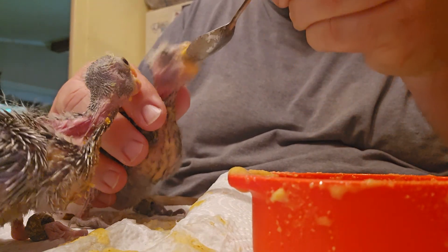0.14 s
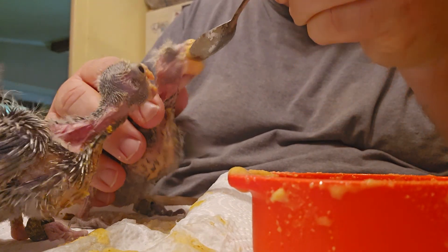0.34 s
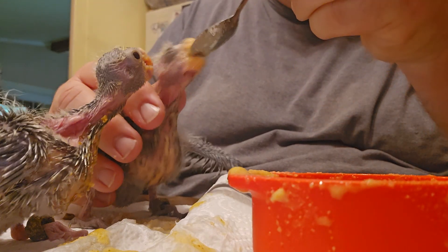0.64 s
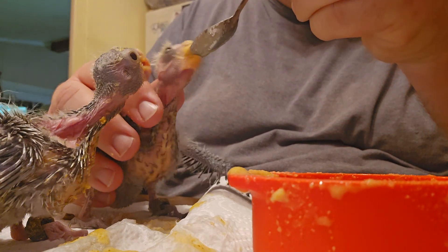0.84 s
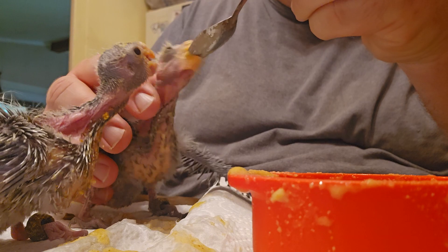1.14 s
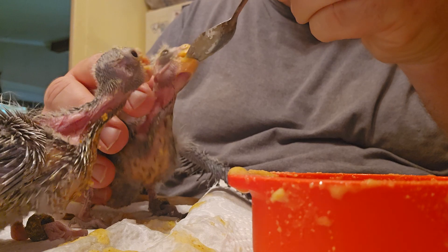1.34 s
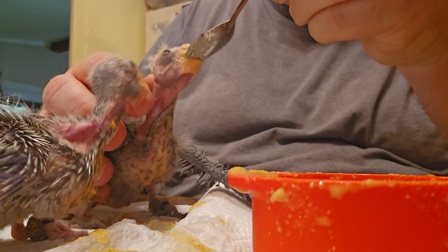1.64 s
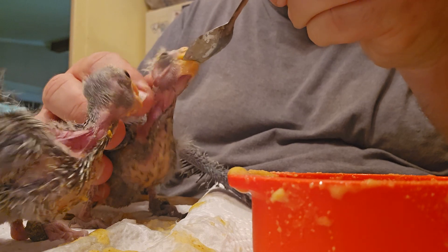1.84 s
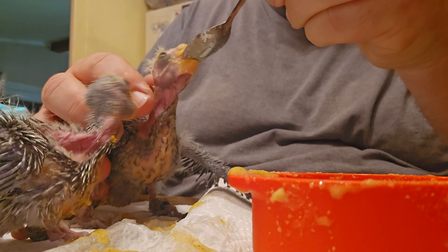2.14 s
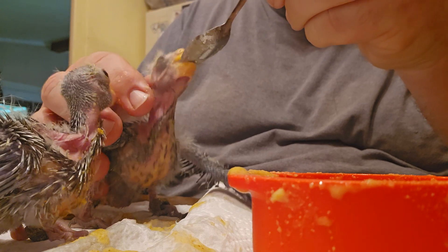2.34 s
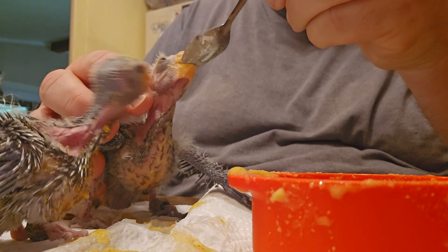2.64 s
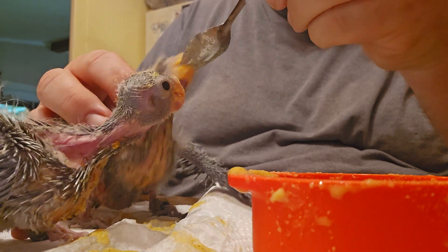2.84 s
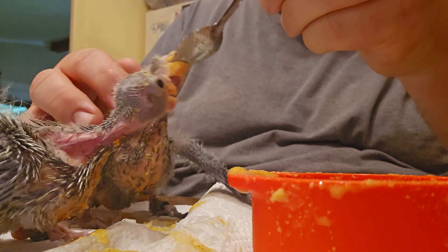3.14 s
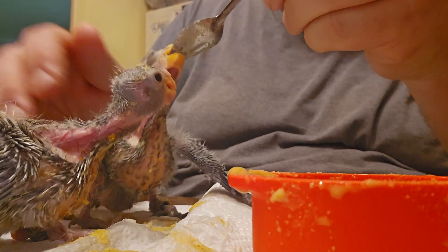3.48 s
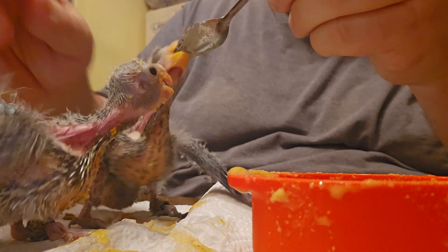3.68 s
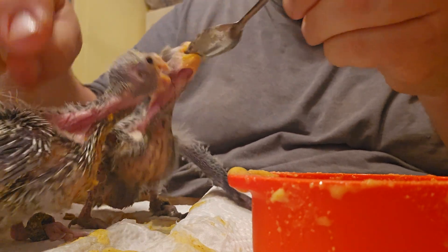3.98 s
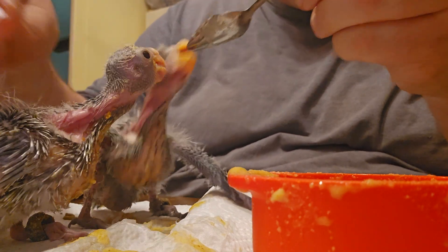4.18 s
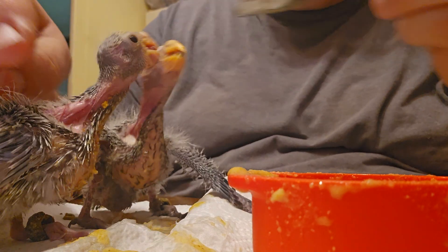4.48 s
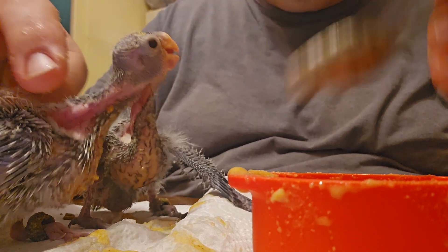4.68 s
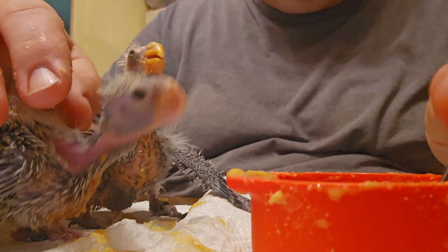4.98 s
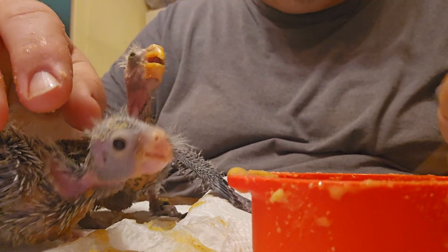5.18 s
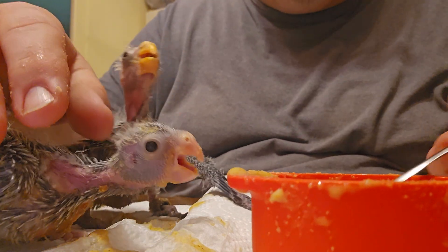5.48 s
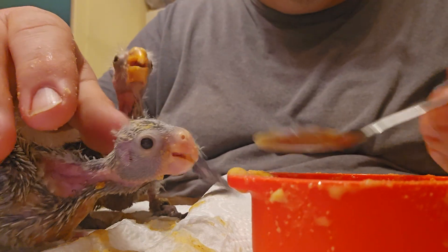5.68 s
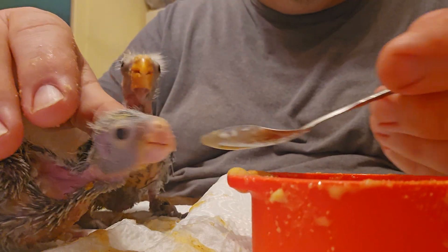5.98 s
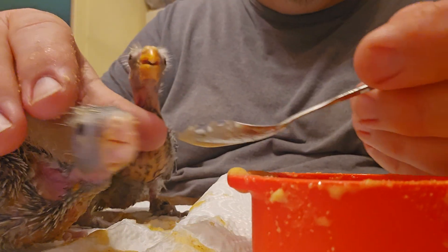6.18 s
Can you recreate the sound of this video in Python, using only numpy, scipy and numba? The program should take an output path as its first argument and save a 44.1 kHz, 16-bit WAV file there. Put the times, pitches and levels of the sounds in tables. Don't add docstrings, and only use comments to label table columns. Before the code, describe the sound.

A parrot chick gives four brief, hoarse two-part begging squeaks close up in a small room, over faint appliance hum and distant chirps.

```python
import sys
import numpy as np
from scipy import signal
from scipy.fft import rfft, irfft
from scipy.io import wavfile
from scipy.ndimage import uniform_filter1d
from numba import njit

SR = 44100
rng = np.random.default_rng(int(sys.argv[2]) if len(sys.argv) > 2 else 0)


def master_out(mix):
    frames = np.transpose(np.atleast_2d(mix))
    ceiling = np.clip(frames, -1, 1)
    pcm = np.round(ceiling * 32767).astype(np.int16)
    wavfile.write(sys.argv[1], SR, pcm)


def makeup_ratio(level_db):
    decades = np.asarray(level_db, float) / 20
    return 10 ** decades


N = 278712
TIME = np.arange(N) / SR

# [pitch_hz, level_db]
HUM_LINES = [(59.2, -66), (91.5, -57), (199.2, -49)]
# [centre_hz, width_hz, level_db]
HOUSING = [(262, 40, -67.5), (397, 30, -69.5), (486, 39, -70.5), (2250, 180, -73.5), (4770, 220, -75.5),
           (5700, 470, -78)]
# [frequency_hz, density_db]
AIR_SPECTRUM = [(20, -30), (40, -29), (70, -23), (130, -18), (220, -12), (320, -21), (500, -19),
                (900, -25.5), (1300, -30.5), (3250, -35.5), (7900, -39), (8900, -42.5), (10200, -57.5),
                (16000, -63.5)]
AIR_DB = -53.5
# [start_s, length_s, start_hz, end_hz, level_db]
FAR_CHIRPS = [(0.617, 0.037, 2200, 1920, -61), (1.083, 0.093, 3990, 4024, -65),
              (1.099, 0.074, 5000, 5100, -68), (1.512, 0.11, 4470, 4405, -64.5),
              (2.473, 0.017, 2400, 2450, -49), (2.495, 0.12, 2964, 3120, -47),
              (2.485, 0.061, 3850, 3900, -59), (2.517, 0.024, 5960, 6000, -56.5),
              (2.728, 0.047, 3760, 3720, -62.5), (2.754, 0.15, 3010, 3030, -58.5),
              (2.829, 0.032, 1930, 2200, -53), (2.877, 0.036, 2170, 2060, -51),
              (2.93, .03, 2140, 2170, -60), (3.0, 0.041, 3310, 3280, -58.5),
              (3.295, .08, 3600, 3720, -64.5), (4.067, 0.069, 4490, 4620, -54.5),
              (4.06, 0.053, 2250, 2313, -54), (4.326, 0.086, 3900, 3590, -66.5),
              (6.096, 0.041, 3500, 3050, -60.5), (6.156, 0.015, 3870, 3780, -54),
              (6.168, 0.028, 2940, 2850, -63), (6.223, 0.055, 2040, 1960, -61)]
# [length_s, start_hz, end_hz, level_db]
TRILL_NOTE = (.035, 4300, 4450, -61)
TRILL_START_S, TRILL_GAP_S, TRILL_NOTES = 0.428, 0.053, 6
# [start_s, length_s, centre_hz, width_hz, level_db]
TICKS = [(.0, 0.091, 4000, 6000, -55), (0.523, 0.026, 85, 60, -43), (1.051, 0.09, 4200, 2500, -58.5),
         (1.35, 0.01, 4500, 1800, -47), (1.352, 0.0068, 7300, 2500, -50.5), (2.481, 0.096, 3400, 1500, -47),
         (2.51, 0.047, 9000, 9000, -62.5), (4.065, 0.071, 4500, 2500, -58),
         (4.947, 0.0031, 2000, 1400, -46.5), (4.948, 0.0043, 9000, 8000, -53),
         (5.011, 0.075, 3500, 4000, -52), (5.01, 0.054, 12000, 6000, -64.5),
         (5.262, 0.0054, 7000, 8000, -39.5), (5.884, 0.0065, 3500, 3000, -62)]
ROOM_T60_S, ROOM_DAMP, ROOM_DB = 0.2, 0.03, -21
# [frequency_hz, left_minus_right_db]
PORT_COLOUR = [(60, -5.5), (110, -5.5), (200, 1.5), (380, 4), (700, -1), (1300, 0.5), (2400, 1), (4400, 3),
               (8100, 5.5), (14000, -7.5)]
# [left_ms, right_ms]
ECHO_MS = (0.3615, 0.4795)
# [start_s, left_lag_ms, left_minus_right_db, table_echo_db]
HEAD = [
    (0, 0.089, 2, -7.5),
    (1.5, 0.1, 1, -7),
    (3.5, .12, 0, -4.5),
    (5.1, 0.16, 0, -12.5),
]

# [frequency_hz, gain_db]
THROAT = [(600, -22.5), (1200, -11), (2000, -11.5), (2700, -12.5), (3300, 1), (4200, 3), (5300, -7),
          (6500, -15.5), (8500, -23), (11000, -21), (15500, -24.5)]
THROAT_SHARE, SLACK_POWER = 0.59, 0.64
# [time_s, pitch_hz, level_db, slack_db]; slack is how far overtones fall
OPENING = [
    [(.086, 1658, -32.5, -16.5), (.093, 1797, -29, -5), (.106, 1826, -22, -3), (.118, 1554, -23.5, -4),
     (.125, 1503, -19, -2), (.128, 2144, -26, -16), (.156, 1914, -20, -15.5)],
    [(1.655, 1812, -30, -8.5), (1.667, 1986, -21.5, -6), (1.684, 2024, -14, -10.5), (1.692, 2006, -22, -7),
     (1.71, 2030, -16.5, -12), (1.728, 2092, -22.5, -20)],
    [(3.634, 1553, -33.5, -21.5), (3.644, 1832, -23.5, -11), (3.653, 2008, -20, -11.5),
     (3.69, 1982, -13, -18), (3.705, 1919, -16, -13), (3.722, 1923, -19, -20)],
    [(5.258, 1604, -32.5, -23), (5.268, 1778, -24, -17), (5.282, 1818, -16, -19),
     (5.295, 1675, -12.5, -11.5), (5.307, 1453, -13.5, -11), (5.32, 1379, -16.5, -7.5),
     (5.331, 1285, -21.5, -1.5)],
]
# [start_s, length_s, entry_hz, lowest_hz, level_db]
BREAKS = [
    (0.158, 0.032, 1090, 844.2, -19),
    (1.732, .03, 1096, 913.2, -17.5),
    (3.726, .021, 956.6, 956.4, -21.5),
    (5.339, 0.034, 1076, 848.6, -14),
]
# [time_s, pitch_hz, level_db, slack_db]
HELD = [
    [(.2, 1991, -22.5, -3.5), (.21, 2123, -13.5, -9), (.222, 2050, -17.5, -3), (.235, 2052, -16.5, -10.5),
     (.26, 2032, -22, -17.5), (.33, 2030, -18, -27), (.355, 2036, -27, -30)],
    [(1.769, 2133, -22, -6.5), (1.776, 2212, -16.5, -6), (1.797, 2186, -19, -7.5),
     (1.803, 2488, -29.5, -19), (1.835, 2213, -29, -34.5), (1.86, 2150, -24, -12), (1.885, 2131, -25, -15),
     (1.903, 1966, -23.5, -8)],
    [(3.755, 2029, -18, -19), (3.765, 2160, -16.5, -11), (3.787, 1983, -17, -15), (3.8, 1963, -20, -16.5),
     (3.83, 2010, -20, -21), (3.862, 2010, -25.5, -15.5)],
    [(5.379, 1875, -23.5, -9), (5.386, 2064, -16, -7), (5.4, 2076, -14, -10), (5.42, 2029, -22.5, -16.5),
     (5.485, 2041, -21, -28), (5.5, 2010, -21.5, -20), (5.51, 1813, -24.5, -9)],
]
# [beak_opening_db, third_partial_db, fourth_partial_db, treble_db, breath_db]
MOUTH = [
    (-4.5, -1.5, -6, 0.5, -18.5),
    (-2, -10.5, -26, 0.5, -17),
    (2.5, -5, 2, 5, -25),
    (9.5, -2.5, 2, -5, -18.5),
]
DROOP = (.9, .91, 1., .93)
ATTACK_S, ATTACK_DB, SCOOP = 0.00872, -18, 0.87
RELEASE_S, RELEASE_DB = 0.011, -13
SAG_AT, SAG_DB, EXIT_HZ, LOW_SLACK_DB = 0.478, -4.5, 1058.3, -8.5

# [start_s, length_s, start_hz, end_hz, level_db]
FLUTTERS = [
    (0.231, .09, 300.8, 441, -25.5),
    (1.802, .102, 215, 479.3, -27.5),
    (3.7, .012, 966, 971, -36.5),
    (3.812, .025, 1010, 1014, -36),
    (5.382, .025, 1024, 1036, -32.5),
    (5.413, 0.082, 312, 498, -22.5),
]
FLUTTER_POWER, FLUTTER_BREATHY = 1.6, 0.12
# [start_s, length_s, level_db]
CATCHES = [
    (.11, 0.019, -24.5),
    (1.685, 0.0075, -22),
    (1.7, 0.0073, -34),
    (1.795, 0.0068, -23.5),
    (3.704, .004, -33.5),
    (5.31, .028, -25),
    (5.41, 0.0054, -20.5),
]
CATCH_HZ, CATCH_BREATHY, CATCH_DIP = 309.6, 0.7, 0.45
LOW_RATTLE_HZ, LOW_RATTLE_DB, LOW_BREATHY = 487.7, -3, 0.93
EDGE_S, FADE_SHARE = 0.005, 0.2
LINE_FALL_DB, LINE_SWELL_DB = -1.5, 5.5
UPPER_LINES_DB, LOWER_LINES_DB = -3, -4


def unit(x):
    return x / np.sqrt(np.mean(x ** 2, axis=-1, keepdims=True))


def colour(hz, table):
    table = np.array(table)
    return np.interp(np.log(np.maximum(hz, 1)), np.log(table[:, 0]), table[:, 1])


def shaped(x, gain):
    n = x.shape[-1]
    return irfft(rfft(x) * gain(np.fft.rfftfreq(n, 1 / SR)), n)


def band(x, hz, width):
    return shaped(x, lambda f: 1 / (1 + ((f - hz) / (width / 2)) ** 4))


def walk(rate):
    k = int(SR / rate)
    held = np.repeat(rng.standard_normal(N // k + 1), k)
    return unit(uniform_filter1d(uniform_filter1d(held, k), k)[:N])


def appliance():
    hum = np.zeros(N)
    for hz, db in HUM_LINES:
        level = makeup_ratio(db + 1.2 * walk(14)) * np.sqrt(2)
        hum += level * np.sin(2 * np.pi * np.cumsum(hz * (1 + 0.016 * walk(22))) / SR)
    mid, side = rng.standard_normal((2, N))
    noise = mid + np.array([[1], [-1]]) * shaped(side, lambda f: np.clip(f / 900, 0.2, 1))
    air = shaped(noise, lambda f: makeup_ratio(colour(f, AIR_SPECTRUM)))
    air *= makeup_ratio(AIR_DB + 0.6 * walk(3)) / np.std(shaped(air, lambda f: f > 250))
    rings = sum(makeup_ratio(db + 1.9 * walk(3.4)) * unit(band(noise, hz, width)) for hz, width, db in HOUSING)
    return hum + air + rings


@njit
def walls(x, lags, gain, damp):
    line, soft, out = np.zeros((8, 4096)), np.zeros(8), np.zeros((2, len(x)))
    for i in range(len(x)):
        total = 0.
        for k in range(8):
            soft[k] += (1 - damp) * (gain[k] * line[k, (i - lags[k]) & 4095] - soft[k])
            total += soft[k]
            out[k % 2, i] += soft[k]
        for k in range(8):
            line[k, i & 4095] = x[i] + soft[k] - total / 4
    return out


def far_chirps():
    out, waver, hoarse = np.zeros(N), walk(300), walk(250)
    trill = [(TRILL_START_S + k * TRILL_GAP_S, *TRILL_NOTE) for k in range(TRILL_NOTES)]
    for s, length, hz, end_hz, db in [*FAR_CHIRPS, *trill]:
        u = np.clip((TIME - s) / length, 0, 1)
        pitch = (hz + (end_hz - hz) * u) * (1 + 0.03 * waver)
        phase = 2 * np.pi * np.cumsum(pitch) / SR
        out += makeup_ratio(db + 6) * np.sin(np.pi * u ** 0.58) * np.sin(phase)
    return out * (1 + 0.5 * hoarse)


def ticks():
    out = np.zeros((2, N))
    for s, length, hz, width, db in TICKS:
        a = int(s * SR)
        t = np.arange(min(N - a, 16384)) / SR
        own = rng.standard_normal((2, 16384))[:, :len(t)]
        grit = own + 0.7 * rng.standard_normal(16384)[:len(t)]
        rise = np.clip(t / (0.11 * length), 0, 1)
        tail = np.exp(-np.maximum(t - 0.64 * length, 0) / (0.5 * length))
        out[:, a:a + len(t)] += makeup_ratio(db) * rise * tail * unit(band(grit, hz, width))
    return out


def ports(voice):
    out = np.zeros((2, N))
    starts = [int(row[0] * SR) for row in HEAD] + [N]
    for (_, lag_ms, pan_db, echo_db), a, b in zip(HEAD, starts, starts[1:]):
        for ch, side in enumerate((0.5, -0.5)):
            def path(f):
                direct = np.exp(-2j * np.pi * f * side * lag_ms / 1000)
                return direct * (1 + makeup_ratio(echo_db) * np.exp(-2j * np.pi * f * ECHO_MS[ch] / 1000))
            out[ch, a:b] = makeup_ratio(side * pan_db) * shaped(voice[a:b], path)
    return out


def calls():
    out = []
    for first, (s, length, entry_hz, low_hz, db), last, droop in zip(OPENING, BREAKS, HELD, DROOP):
        attack = np.array(first[0]) * (1, SCOOP, 1, 1) + (-ATTACK_S, 0, ATTACK_DB, 0)
        release = np.array(last[-1]) * (1, droop, 1, 1) + (RELEASE_S, 0, RELEASE_DB, 0)
        low = [(s, entry_hz, db, LOW_SLACK_DB),
               (s + SAG_AT * length, low_hz, db + SAG_DB, LOW_SLACK_DB),
               (s + length, EXIT_HZ, db, LOW_SLACK_DB)]
        out.append(np.array([attack, *first, *low, *last, release]))
    return out


def tracks(tables):
    s, *columns = np.concatenate(tables).T
    gate = sum((TIME >= t[0][0] - 0.002) & (TIME <= t[-1][0] + 0.002) for t in tables) > 0
    return uniform_filter1d(1. * gate, 180), [np.interp(TIME, s, c) for c in columns]


def rattles(breath_db):
    rate, size, breathy = np.full(N, 1. * CATCH_HZ), makeup_ratio(breath_db), np.full(N, 0.8)
    rows = [(*row, FLUTTER_BREATHY) for row in FLUTTERS]
    rows += [(s, length, CATCH_HZ, CATCH_HZ, db, CATCH_BREATHY) for s, length, db in CATCHES]
    rows += [(s, length, LOW_RATTLE_HZ, LOW_RATTLE_HZ, db + LOW_RATTLE_DB, LOW_BREATHY)
             for s, length, _, _, db in BREAKS]
    for s, length, hz, end_hz, db, share in rows:
        fade = (s + length - TIME) * EDGE_S / (EDGE_S + FADE_SHARE * length)
        on = np.clip(np.minimum(TIME - s, fade) / EDGE_S + 1, 0, 1) ** 2
        glide = np.clip((TIME - s) / length, 0, 1) ** FLUTTER_POWER
        rate = np.where(on > 0, hz + (end_hz - hz) * glide, rate)
        size = np.maximum(size, on * makeup_ratio(db))
        breathy = breathy + on * (share - breathy)
    return rate, size, breathy


def side_lines(phase, turns, on):
    out = np.zeros(N)
    for k in range(4):
        for n in (*range(-3, 0), *range(1, 6)):
            db = k * UPPER_LINES_DB + LINE_FALL_DB * abs(n) + (n < 0) * LOWER_LINES_DB
            db = db + LINE_SWELL_DB * walk(45)[on]
            out[on] += makeup_ratio(db) * np.sin((k + 1) * phase[on] + 2 * np.pi * n * turns[on] + n * n)
    return out


def partials(hz, level_db, slack_db, mouth, low):
    beak_db, third_db, fourth_db = mouth
    partial_db = []
    for k, own_db in enumerate((0, 0, third_db, fourth_db), 1):
        throat_db = THROAT_SHARE * (1 - 0.4 * low) * (colour(k * hz, THROAT) - colour(hz, THROAT))
        sinking_db = (k == 4) * low * beak_db * (np.gradient(hz) < 0)
        open_db = beak_db / (1 + ((k * hz - 5000) / 900) ** 4)
        source_db = level_db + slack_db * (k - 1) ** SLACK_POWER
        partial_db.append(source_db + throat_db + (1 - low) * own_db + sinking_db + open_db)
    phase = 2 * np.pi * np.cumsum(hz * (1 + (0.002 + 0.03 * low) * walk(400))) / SR
    voice = np.zeros(N)
    for k, db in enumerate(partial_db, 1):
        voice += makeup_ratio(db + (0.7 * k + 3.2 * low) * walk(200)) * np.sin(k * phase + k * k)
    top_db = np.maximum(partial_db[2], partial_db[3])
    for k in range(5, 16):
        slope_db = colour(k * hz, THROAT) - colour(3.32 * hz, THROAT) - 2.2 * (k - 4) - 5.5 * low
        level = makeup_ratio(top_db + slope_db + 3.0 * walk(120))
        voice += (k * hz < 16000) * level * np.sin(k * phase + k * k)
    return voice, phase


def chick():
    gate, (hz, level_db, slack_db) = tracks(calls())
    on = gate > 0
    call = np.searchsorted(np.array(HEAD)[1:, 0], TIME)
    beak_db, third_db, fourth_db, treble_db, breath_db = np.array(MOUTH)[call].T
    low = np.clip((1300 - hz) / 300, 0, 1)
    voice, phase = partials(hz, level_db, slack_db, (beak_db, third_db, fourth_db), low)
    voice *= 1 - CATCH_DIP * sum(np.exp(-((TIME - s - length) / 0.0016) ** 2) for s, length, _ in CATCHES)

    rate, size, breathy = rattles(level_db + breath_db)
    turns = np.cumsum(rate * (1 + 0.03 * walk(100))) / SR
    chopped = side_lines(phase, turns, on)
    breath = on * (0.25 + np.exp(-(turns % 1) / 0.35)) * rng.standard_normal(N)
    breathy = np.clip(breathy + 0.12 * walk(50), 0, 1)
    rasp = np.zeros(N)
    for weight, x in ((np.sqrt(1 - breathy), chopped), (np.sqrt(breathy), breath)):
        throaty = unit(shaped(x, lambda f: makeup_ratio(colour(f, THROAT))))
        rasp += weight * throaty * np.sqrt(np.mean(on))
    rasp += (makeup_ratio(beak_db * (1 - 0.45 * low) + 3.7 * walk(60)) - 1) * band(rasp, 5260, 990)
    rasp += (makeup_ratio(3 * walk(60)) - 1) * band(rasp, 3200, 900)

    def treble(x):
        return x + (makeup_ratio(treble_db) - 1) * shaped(x, lambda f: 1 / (1 + (6900 / (f + 1)) ** 8))
    return treble(gate * (np.sqrt(2) * treble(voice) + size * makeup_ratio(1.97 * walk(70)) * rasp))


def scene():
    voice, far = chick(), far_chirps()
    lags = rng.integers(300, 1700, 8)
    sent = makeup_ratio(ROOM_DB + 3.8 * walk(70)) * voice + makeup_ratio(-4.5) * far + 1e-18
    room = walls(sent, lags, makeup_ratio(-60 * lags / SR / ROOM_T60_S), ROOM_DAMP)
    around = far + appliance()
    around[0] = np.roll(around[0], 8)
    return ports(voice) + room + ticks() + around


def band_limit(x):
    return signal.sosfilt(signal.butter(12, 16200, fs=SR, output="sos"), x)


def record(dry):
    def response(f):
        sides = makeup_ratio(np.array([[0.5], [-0.5]]) * colour(f, PORT_COLOUR))
        dip = 1 - 1 / (1 + ((f - 9600) / 480) ** 4)
        return sides * dip / (1 + (36 / (f + 1)) ** 3)
    mix = shaped(0.96 * np.tanh(dry / 0.88), response)
    return band_limit(mix)


dry = scene()
out = record(dry)
master_out(out)
```